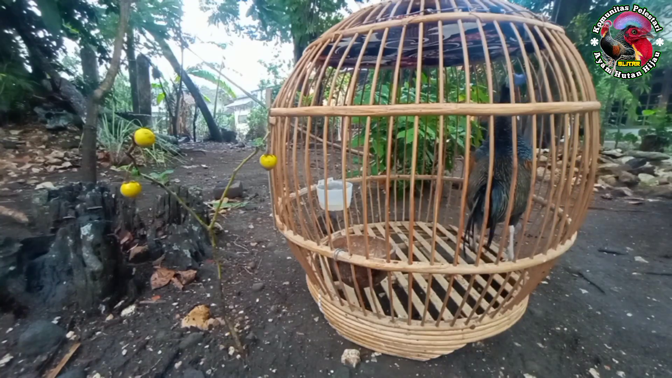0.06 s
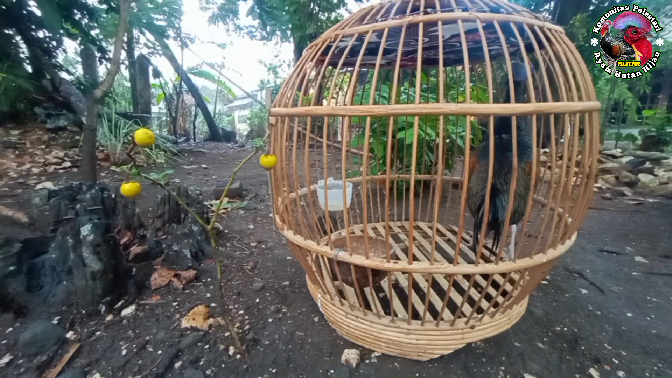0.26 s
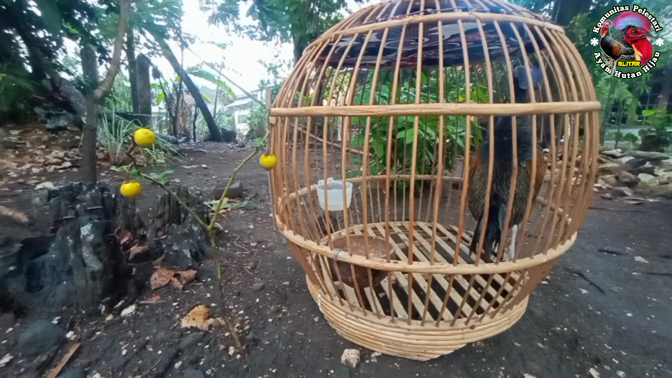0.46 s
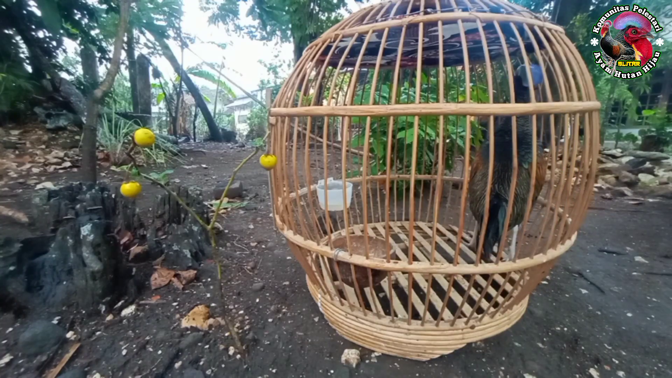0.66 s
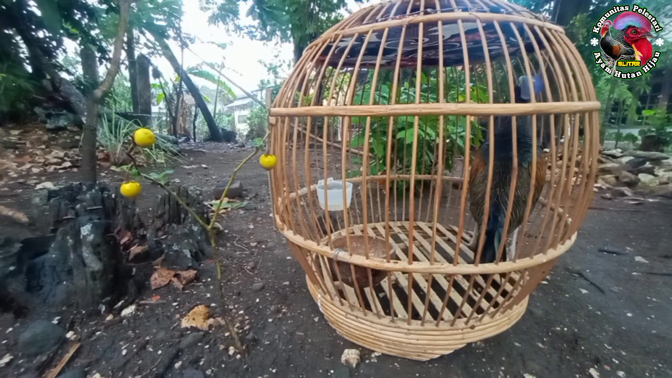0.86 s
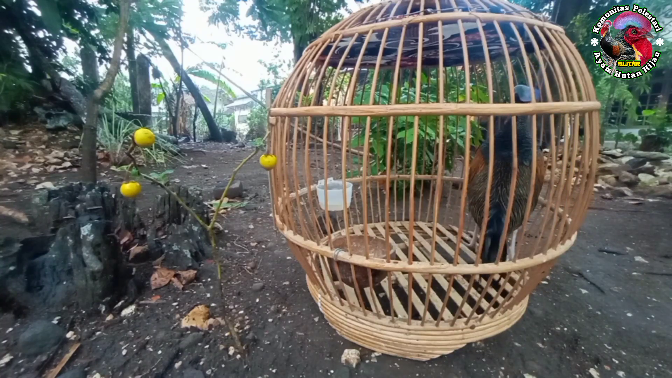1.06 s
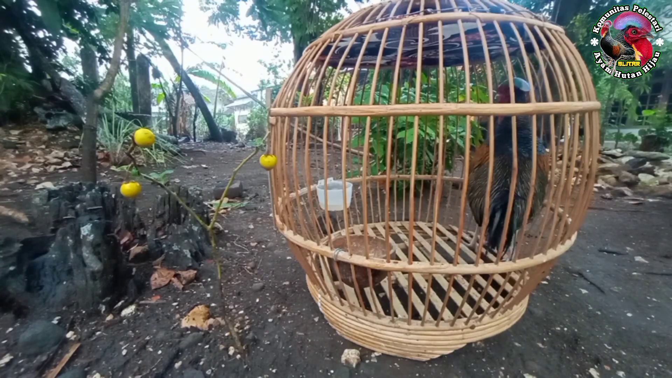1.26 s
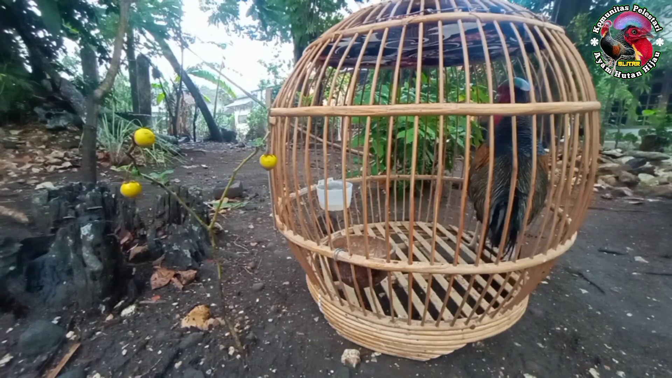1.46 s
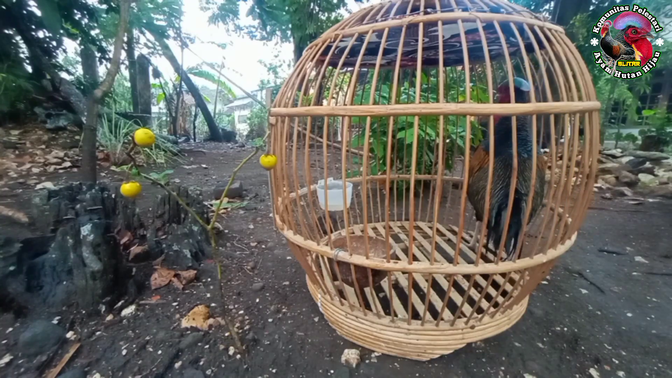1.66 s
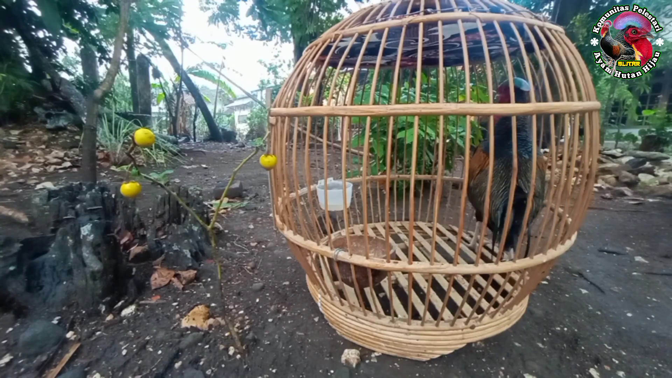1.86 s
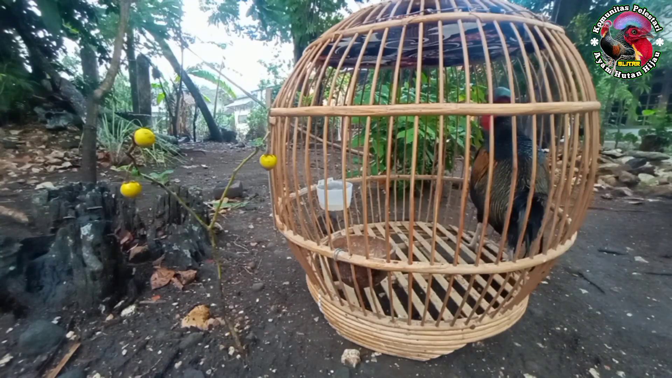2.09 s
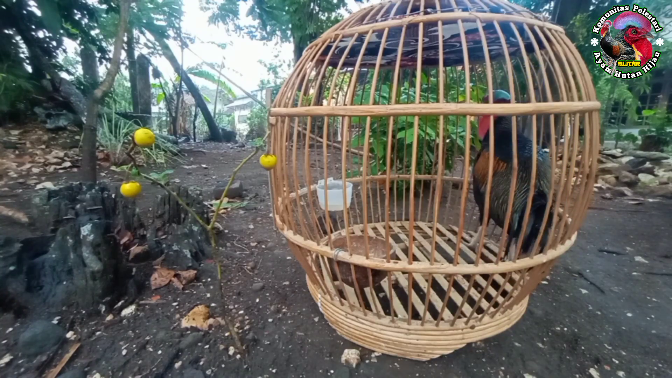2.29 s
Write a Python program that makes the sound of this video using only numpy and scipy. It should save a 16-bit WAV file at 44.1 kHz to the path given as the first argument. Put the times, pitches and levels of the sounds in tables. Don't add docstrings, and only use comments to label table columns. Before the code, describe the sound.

A caged junglefowl cock crows once, three clipped notes then a rough warbling shriek, outdoors

```python
import sys
import numpy as np
from scipy import signal
from scipy.fft import rfft, irfft
from scipy.io import wavfile
from scipy.ndimage import uniform_filter1d, minimum_filter1d

SR = 44100
rng = np.random.default_rng(int(sys.argv[2]) if len(sys.argv) > 2 else 0)


def ratio(d):
    e = np.asarray(d, float) / 20
    return 10 ** e


def int16_out(signal):
    q = np.round(np.clip(np.atleast_2d(signal).T, -1, 1) * 32767)
    wavfile.write(sys.argv[1], SR, q.astype(np.int16))


N = 101430


def at_hz(points, hz):
    points = np.array(points)
    return np.interp(np.log(hz), np.log(points[:, 0]), points[:, 1])


def rms_one(x):
    return x / np.sqrt(np.mean(x ** 2) + 1e-20)


def drift(rate_hz):
    r = np.exp(-2 * np.pi * rate_hz / SR)
    settle = 9000
    wander = signal.lfilter([1], [1, -2 * r, r * r], rng.standard_normal(N + settle))
    return rms_one(wander[settle:])


def resonance(x, hz, width_hz):
    r = np.exp(-np.pi * width_hz / SR)
    top = np.array([1, 0, -1]) * (1 - r * r) / 2
    return signal.lfilter(top, [1, -2 * r * np.cos(2 * np.pi * hz / SR), r * r], x)


def butter(x, order, hz, kind="low"):
    return signal.sosfilt(signal.butter(order, hz, kind, fs=SR, output="sos"), x)


def coloured(x, db_at):
    hz = np.maximum(np.fft.rfftfreq(len(x), 1 / SR), 1)
    return irfft(rfft(x) * ratio(db_at(hz)), len(x))


def patches(rows):
    t = np.arange(N) / SR
    out = np.zeros(N)
    for s, half, hz, width, db in rows:
        noise = resonance(resonance(rng.standard_normal(N), hz, width), hz, width)
        noise = rms_one(resonance(noise, hz, 2 * width))
        out += ratio(db + 2.06 * drift(21.2)) * np.exp(-((t - s) / half) ** 2) * noise
    return out


# hz, level_db (per Hz)
AIR_SPECTRUM = [(25, -20), (60, -7.5), (120, -4.5), (260, -5.5), (420, -9), (1000, -9), (4500, -28),
                (8000, -38.5)]
# time_s, level_db
FAR_COCK = [(0, -71.5), (0.149, -73.5), (1.5, -68.5), (1.66, -80.5), (1.779, -66.5), (1.9, -80), (2.1, -69),
            (2.17, -73), (2.3, -72.5)]
AIR_DB, GUST_DB = -73, 2.5
DRONE_HZ, DRONE_WIDTH_HZ = 1250, 62


def background():
    air = rms_one(coloured(rng.standard_normal(N), lambda hz: at_hz(AIR_SPECTRUM, hz)))
    low = butter(air, 2, 300)
    air = ratio(AIR_DB) * (ratio(drift(2)) * (air - low) + ratio(GUST_DB * drift(5.4)) * low)
    drone = resonance(rng.standard_normal(N), DRONE_HZ, DRONE_WIDTH_HZ)
    drone = rms_one(resonance(drone, DRONE_HZ, 5.9 * DRONE_WIDTH_HZ))
    drone_db = np.interp(np.arange(N) / SR, *np.transpose(FAR_COCK)) + 2.0 * drift(8)
    return air + ratio(drone_db) * drone


# start_s, length_s, from_hz, to_hz, level_db
BIRD_WHISTLES = [(0, 0.031, 6520, 6600, -83.5), (0.124, 0.13, 7160, 7800, -81),
                 (1.478, 0.051, 3500, 3493, -77), (1.582, 0.039, 4000, 4406, -86),
                 (1.617, .025, 3200, 4700, -82), (1.655, 0.071, 3700, 3550, -78.5),
                 (1.635, .03, 4700, 4600, -81.5), (1.835, .025, 3100, 4840, -80),
                 (1.865, 0.0492, 4000, 3580, -81), (1.956, 0.027, 5400, 5334, -82),
                 (2.081, 0.11, 3774, 3600, -79.5), (2.199, 0.07, 4190, 4700, -83),
                 (2.187, 0.19, 1256, 1250, -68)]
BIRD_BLUR, BIRD_WET_DB = 0.027, -2.5


def birds():
    out, blur = np.zeros(N), 1 + BIRD_BLUR * drift(80)
    for s, length, from_hz, to_hz, db in BIRD_WHISTLES:
        i = np.arange(int(max(s, 0) * SR), min(int((s + length) * SR), N))
        u = np.linspace(0, 1, len(i))
        hz = (from_hz + (to_hz - from_hz) * np.sin(np.pi * u / 2)) * blur[i]
        swell = np.sqrt(np.sin(np.pi * u))
        out[i] += ratio(db + 7.0) * swell * np.sin(2 * np.pi * np.cumsum(hz) / SR)
    return out + ratio(BIRD_WET_DB) * yard(out)


# hz, width_hz, level_db
CLUCK_PEAKS = [(930, 460, 2), (1400, 130, -6.5), (2580, 280, -14.5)]
CLUCK_S, CLUCK_LENGTH_S, CLUCK_DB = 0.185, 0.0045, -44


def cluck():
    t = np.arange(N) / SR
    puff = rng.standard_normal(N) * np.exp(-((t - CLUCK_S) / CLUCK_LENGTH_S) ** 2) + 1e-18
    voiced = sum(ratio(db) * resonance(resonance(puff, hz, w), hz, 2 * w) for hz, w, db in CLUCK_PEAKS)
    return 10 * ratio(CLUCK_DB) * voiced


# time_s, pitch_hz, level_db
SECOND_VOICE = [(0.215, 2995, -74), (0.218, 3048, -50.5), (0.2234, 2989, -10), (.229, 2924, -9.5),
                (0.233, 2940, -18.5), (.242, 2830, -44.5)]
WHISTLE_OCTAVE_DB = -16


def whistle():
    t, (s, hz, db) = np.arange(N) / SR, np.transpose(SECOND_VOICE)
    phase = 2 * np.pi * np.cumsum(np.interp(t, s, hz)) / SR
    wave = np.cos(phase) + ratio(WHISTLE_OCTAVE_DB) * np.cos(2 * phase)
    return ratio(np.interp(t, s, db, -120, -120)) * wave


# time_s, pitch_hz, level_db, roughness (0-1)
SHORT_NOTES = [
    [(.220, 1348, -53, 0.5), (.226, 1337, -22.5, 0.6), (.236, 1363, -20.5, 0.5), (.249, 1308, -18, .4),
     (.254, 1214, -19.5, 0.3), (.259, 928.7, -23.5, 0.1), (.290, 629.6, -32, 0), (.310, 690.4, -31.5, 0),
     (.345, 798, -43.5, 0.08)],
    [(.350, 639, -48, 0.3), (.353, 698.2, -22, 0.2), (.366, 679.4, -21, 0), (.373, 808, -25.5, 0.1),
     (.383, 901, -44, 0.4)],
    [(.386, 926, -39, 0.2), (.390, 891.4, -20.5, 0.4), (.406, 957.4, -18, 0.36), (.418, 884.4, -17, 0.04),
     (.435, 933, -18, 0), (.456, 820, -19.5, 0.1), (.467, 934, -23.5, 0.05), (.474, 1010, -48, 0.25)],
]
# time_s, pitch_hz, level_db, roughness (0-1)
LONG_NOTE = [
    [(.551, 760, -52.5, 0.28), (.554, 782, -19, 0.1), (.570, 839.7, -18, 0.11), (.606, 909.7, -15.5, 0),
     (.640, 954.4, -17, 0.02), (.668, 996, -17, 0.16), (.673, 1210, -19.5, 0.2)],
    [(.680, 1210, -17.5, 0.5), (.760, 1280, -18.5, 0.36), (.850, 1330, -18.5, 0.38),
     (.895, 1375, -19, 0.36), (.908, 1289, -11.5, 0.5), (.918, 1307, -20.5, 0.11),
     (.942, 1215, -20.5, 0.15), (.949, 1118, -25.5, 0.35), (.975, 739, -37.5, 0.28)],
]
# time_s, slide_hz, upper_register_hz, upper_share (of each cycle)
WARBLE_COURSE = [(0.595, 3, 1490, 0), (0.638, 28, 1490, 0), (0.680, 39, 1490, 0), (.686, 50, 1490, .45),
                 (0.844, 70, 1620, .45), (0.852, 48, 1600, .2), (0.888, 40, 1560, .2), (.894, 25, 1560, 0),
                 (0.931, 3, 1560, 0)]
# hz, width_hz, level_db
THROAT_PEAKS = [(886, 690, -11), (1219, 158.4, 9.5), (1653, 780, -5.5), (2853, 374, 2), (3600, 320, -0.5),
                (3870, 260, -1.5), (4728, 500, -5.5), (5511, 230, -4), (7150, 1400, -20.5),
                (9570, 1900, -25.5), (15160, 760, -39)]
# hz, width_hz, removed (share)
THROAT_NOTCHES = [(1402.5, 160, 1), (2250, 740, 0.27), (4580, 180, 0.628)]
THROAT_CUT_HZ = 590
WARBLE_PER_S, WARBLE_LOW_S, WARBLE_WANDER = 38.7, 0.778, 0.015
RIPPLE_PER_S, RIPPLE_LOW_S, RIPPLE_END_S = 52.6, 0.637, 0.675
REGISTER_HZ, REGISTER_LOSS_DB = 1485, -23
UPPER_SAG_HZ, UPPER_DB = 220, 3
UPPER_STEADY = 0.61
LOW_OCTAVE_DB, FLIP_LOSS_DB = -9, -9
JITTER, SHIMMER_DB, BREATH_DB, RASP = 0.034, 11.5, -1.5, 2.5
TILT_DB, FRAY = -2.5, 0.011
SMEAR, TOP_SMEAR = 0.6, 0.003


def cock():
    t = np.arange(N) / SR
    rows, warble = np.concatenate(SHORT_NOTES + LONG_NOTE), np.array(WARBLE_COURSE)
    hz, db, rough = (np.interp(t, rows[:, 0], rows[:, k]) for k in range(1, 4))
    slide, upper, share = (np.interp(t, warble[:, 0], warble[:, k]) for k in range(1, 4))
    silent = (t < rows[0, 0]) | (t > rows[-1, 0])
    silent |= (t > SHORT_NOTES[-1][-1][0]) & (t < LONG_NOTE[0][0][0])

    turn = (WARBLE_PER_S * (t - WARBLE_LOW_S) + WARBLE_WANDER * drift(40)) % 1
    turn = np.where(t < RIPPLE_END_S, RIPPLE_PER_S * (t - RIPPLE_LOW_S) % 1, turn)
    high = turn > 1 - share
    upper = upper - UPPER_SAG_HZ * np.clip((turn - 0.86) / 0.06, 0, 1)
    hz = np.where(high, upper, hz - slide * np.cos(2 * np.pi * turn))

    high = np.maximum(uniform_filter1d(1.0 * high, size=90), np.clip((hz - REGISTER_HZ) / 60, 0, 1))
    rough = rough * (1 - UPPER_STEADY * high * (share > 0.2))
    pitch_speed = np.abs(np.gradient(uniform_filter1d(hz, size=60)))
    flip = np.clip(pitch_speed / 2.5, 0, 1) * (share > 0)
    weak = LOW_OCTAVE_DB * (1 - high) * np.clip(share / 0.4, 0, 1)
    closing = uniform_filter1d(2 * share * np.clip((turn - 0.28) / 0.2, 0, 1), size=90)
    choke = REGISTER_LOSS_DB * np.maximum(high, closing)

    hz = uniform_filter1d(hz, size=30) * (1 + JITTER * rough * drift(250))
    phase = 2 * np.pi * np.cumsum(hz) / SR
    rasp = RASP * rough * np.cos(phase / 3)
    tone = np.zeros(N)
    for k in range(1, 22):
        level = TILT_DB * np.log2(k) + SHIMMER_DB * (rough + FRAY * k) * min(k / 2, 1) * drift(200)
        level = level + choke * (k == 1) + (weak * (k == 2) + FLIP_LOSS_DB * flip) * (k > 1)
        smear = (SMEAR * rough * (k > 1) + TOP_SMEAR * k ** 2) * drift(270)
        overtone = ratio(level) * np.cos(k * phase + smear)
        tone += overtone * (1 + rasp * min((k - 0.7) / 2, 1)) * (k * hz < 0.45 * SR)

    hiss = signal.lfilter([1, -0.8], [1], rng.standard_normal(N))
    breath = ratio(BREATH_DB) * 4 * (rough + FRAY) * hiss * (1 + np.cos(phase))
    source = ratio(db + UPPER_DB * high) * ~silent * (tone + breath) + 1e-18

    out = np.zeros(N)
    for k, (f, width, gain_db) in enumerate(THROAT_PEAKS):
        out += (-1) ** k * ratio(gain_db) * resonance(source, f, width)
    for f, width, removed in THROAT_NOTCHES:
        out = out - removed * resonance(out, f, width)
    return -2 * butter(out, 6, THROAT_CUT_HZ, "high")


# hz, t60_s
YARD_DECAY = [(500, 0.95), (1250, 0.48), (3000, 1.1), (7000, 0.62), (11000, .42), (16000, .34)]
# hz, level_db
YARD_TONE = [(500, -4), (1250, 6.5), (2800, -2.5), (7000, 10), (16000, 10)]
YARD_DB, YARD_RISE_S, YARD_END_S = -11, 0.0071, 0.44


def yard(x):
    t, tail = np.arange(SR) / SR, np.zeros(SR)
    edges = 300 * 2 ** np.arange(0, 6.1, 0.5)
    for low, high in zip(edges, edges[1:]):
        band = butter(rng.standard_normal(SR), 3, [low, high], "band")
        hz = np.sqrt(low * high)
        tail += band * ratio(at_hz(YARD_TONE, hz) - 60 * t / at_hz(YARD_DECAY, hz))
    tail = tail * (1 - np.exp(-t / YARD_RISE_S)) * np.exp(-(t / YARD_END_S) ** 3)
    return signal.fftconvolve(x, tail / np.sqrt(np.sum(tail ** 2)))[:N]


# delay_s, level_db
FAR_RETURNS = [
    (.05, -23),
    (.16, -18),
    (.355, -35),
    (.41, -42.5),
    (.5, -53.5),
]
ECHO_BLUR_S, ECHO_HZ, ECHO_WIDTH_HZ = 0.02, 1260, 260


def echoes(x):
    taps, t = np.zeros(SR), np.arange(SR) / SR
    for s, db in FAR_RETURNS:
        burst = rng.standard_normal(SR) * np.exp(-((t - s) / ECHO_BLUR_S) ** 2)
        taps += ratio(db) * burst / np.sqrt(np.sum(burst ** 2))
    return signal.fftconvolve(resonance(x, ECHO_HZ, ECHO_WIDTH_HZ), taps)[:N]


SLAP_S, SLAP_DB, SLAP_CUT_HZ = 0.051, -23, 6000


def slap(x):
    late = np.concatenate([np.zeros(int(SLAP_S * SR)), x])[:N]
    return ratio(SLAP_DB) * butter(late, 2, SLAP_CUT_HZ)


# time_s, half_length_s, hz, width_hz, level_db
SHUFFLES = [
    (1.19, 0.028, 250.2, 60, -67.5),
    (1.245, 0.048, 251, 88.1, -64),
    (1.285, 0.025, 549, 49.8, -58),
    (1.38, 0.019, 542, 60.3, -76),
    (1.83, 0.093, 110.1, 70, -75),
    (1.97, 0.083, 159.2, 146, -74.5),
    (2.275, .025, 257, 50, -74.5),
]
# time_s, level_db
CREAKS = [
    (1.331, -63),
    (1.555, -82),
    (1.752, -71),
]
TICK_T60_S, TICK_HZ = 0.01, 5785


def steps():
    t = np.arange(N) / SR
    decay = sum(ratio(db - 60 * np.abs(t - s) / TICK_T60_S) * (t > s) for s, db in CREAKS)
    ticks = decay * rng.standard_normal(N)
    return patches(SHUFFLES) + 2 * resonance(ticks + 1e-18, TICK_HZ, 7000)


# time_s, half_length_s, hz, width_hz, level_db
SPARROW_CALLS = [(1.52, 0.083, 4050, 599, -93), (1.88, 0.068, 4608, 601.4, -85),
                 (2.0, 0.049, 3860, 1330, -74), (2.0, 0.052, 4900, 370, -84),
                 (2.125, 0.041, 4700, 500, -80), (2.12, 0.07, 3950, 730, -79.5), (1.6, .03, 4200, 500, -80),
                 (1.71, 0.046, 6500, 300, -94), (2.24, 0.043, 4260, 1000, -79),
                 (1.898, 0.052, 7120, 302.3, -98), (2.2, 0.13, 7000, 600, -97.5)]


def sparrows():
    return patches(SPARROW_CALLS)


def scene():
    crow = cock() + whistle() + cluck()
    answer = ratio(YARD_DB) * yard(crow) + echoes(crow) + slap(crow)
    around = birds() + sparrows() + steps() + background()
    return (crow + answer + around)[None]


def top_cut(x):
    return signal.sosfilt(signal.butter(12, 16270, fs=SR, output="sos"), x)


CEILING, CUTOFF_HZ = 0.7, 16150


def record(dry):
    gain = minimum_filter1d(np.minimum(1, CEILING / (np.abs(dry) + 1e-9)), size=301)
    held = dry * uniform_filter1d(uniform_filter1d(gain, size=150), size=150)
    mix = signal.sosfilt(signal.cheby2(12, 60, CUTOFF_HZ, fs=SR, output="sos"), held)
    return top_cut(mix)


dry = scene()
out = record(dry)
int16_out(out)
```